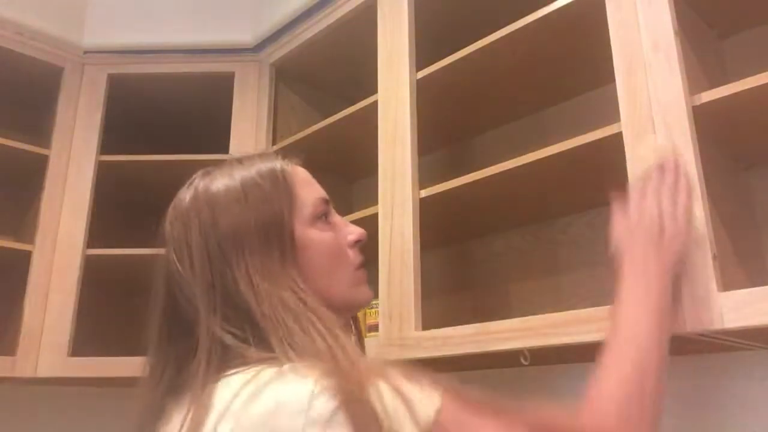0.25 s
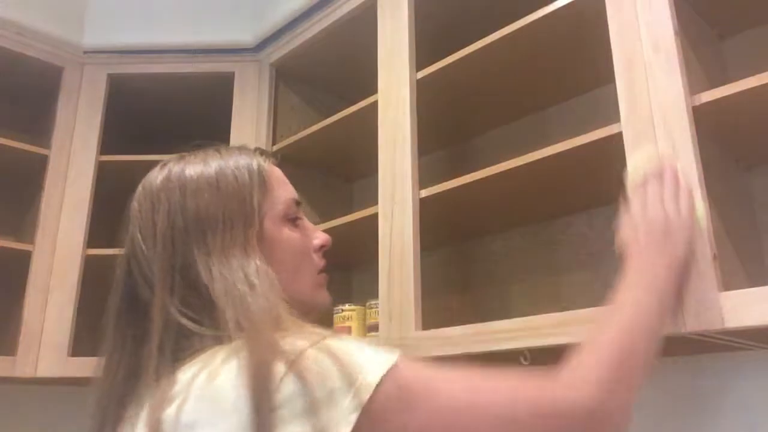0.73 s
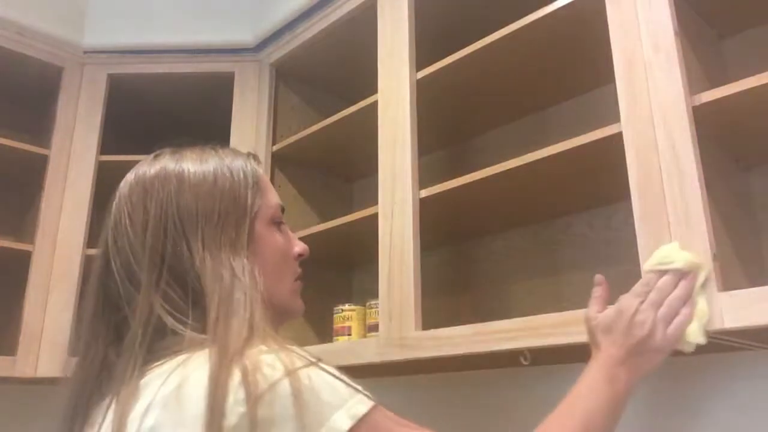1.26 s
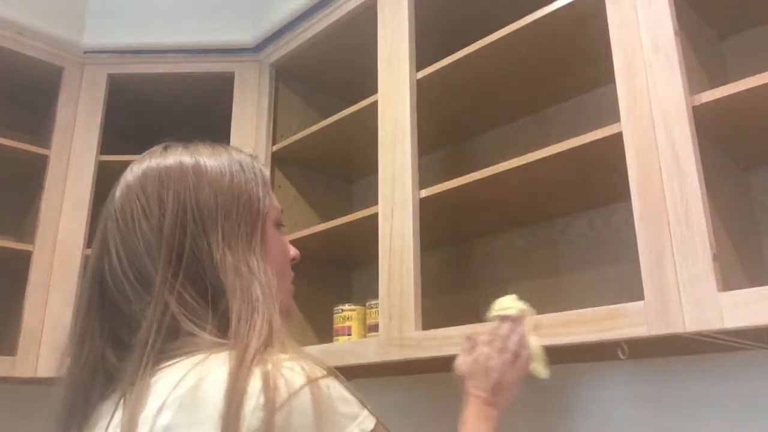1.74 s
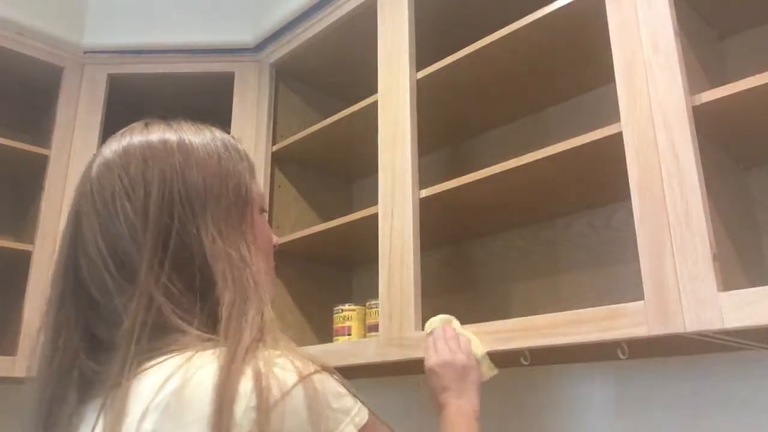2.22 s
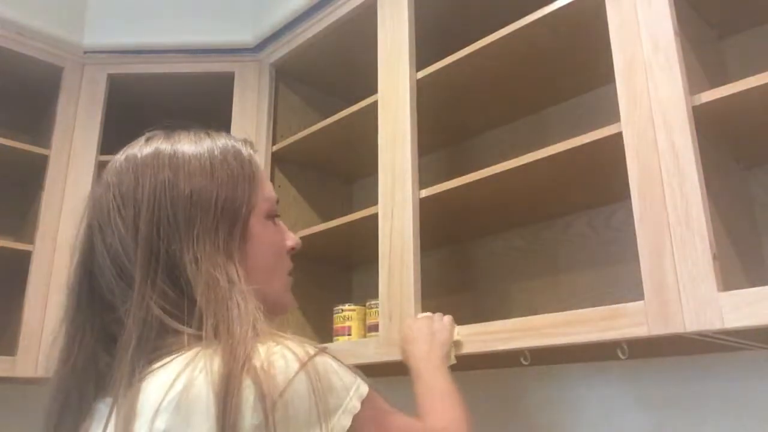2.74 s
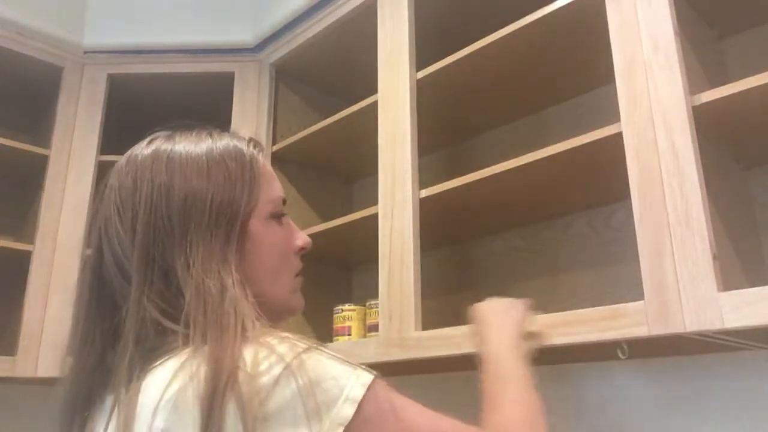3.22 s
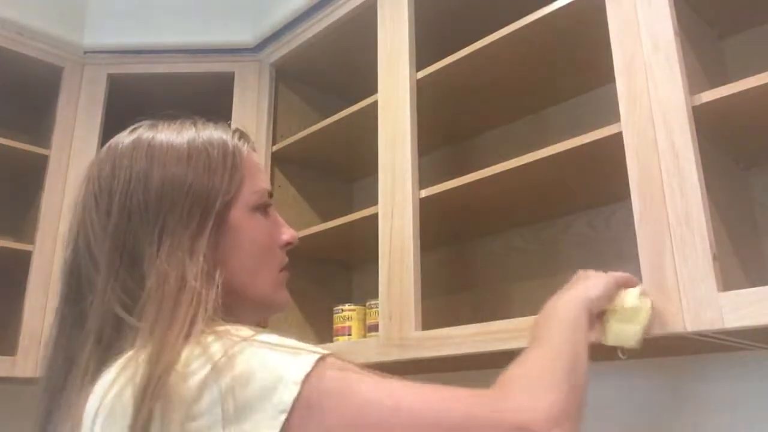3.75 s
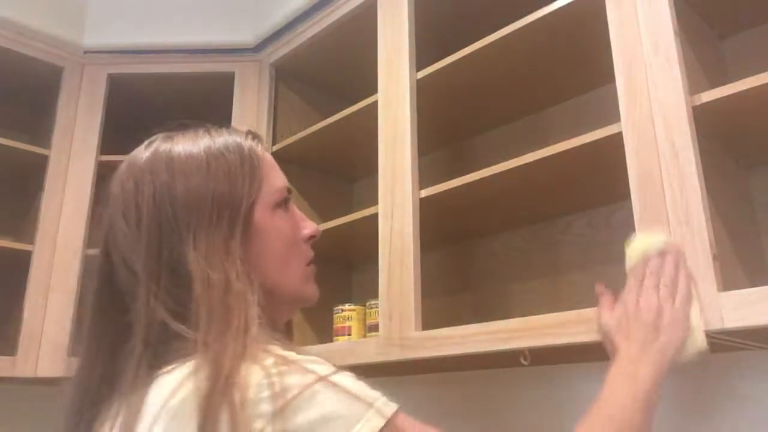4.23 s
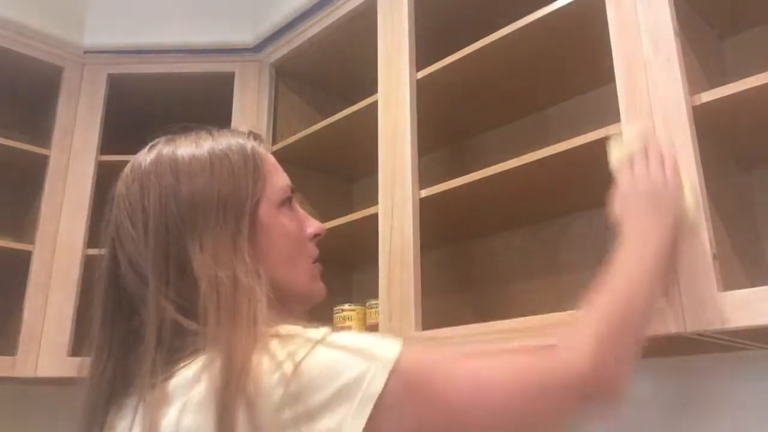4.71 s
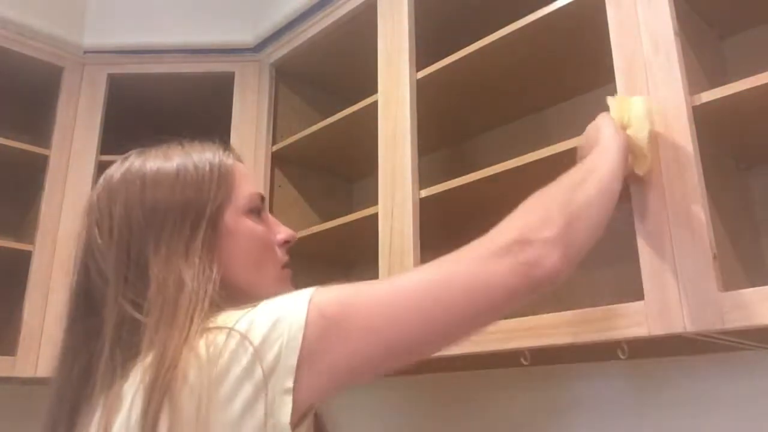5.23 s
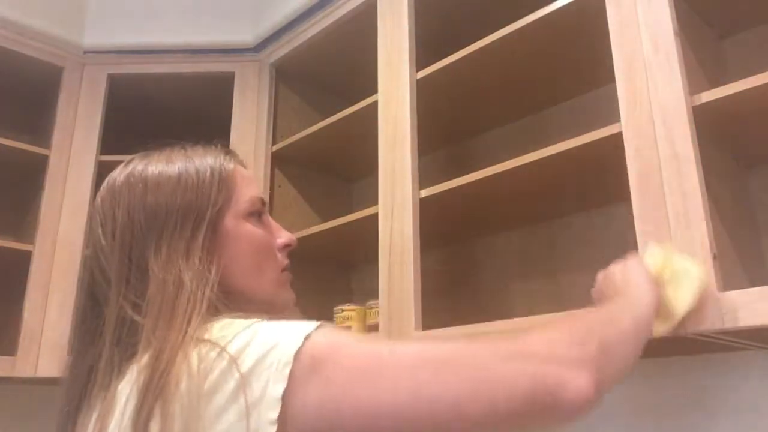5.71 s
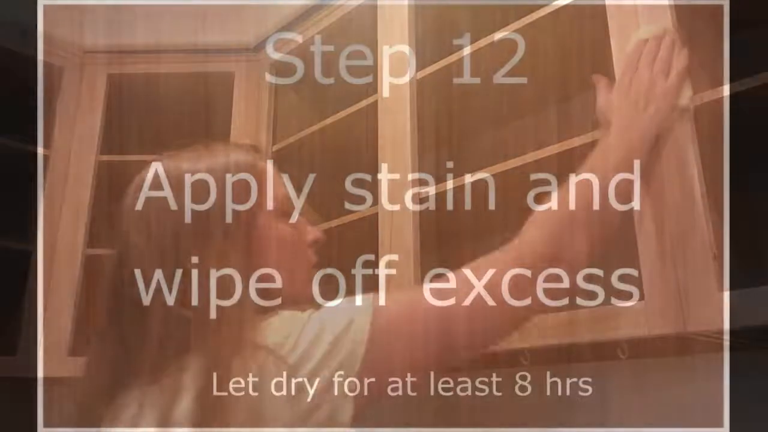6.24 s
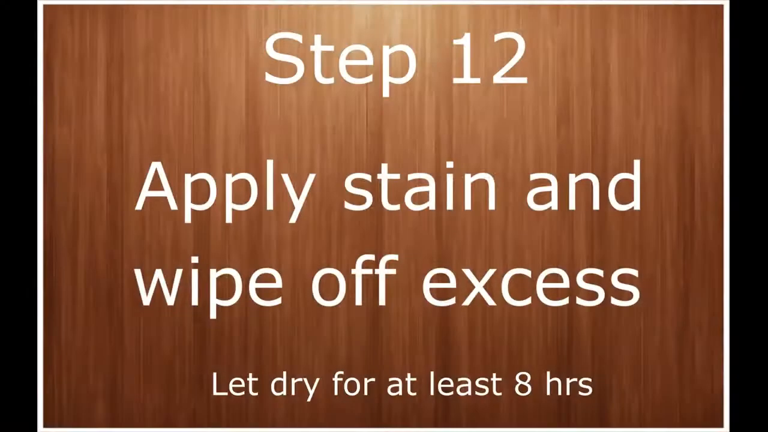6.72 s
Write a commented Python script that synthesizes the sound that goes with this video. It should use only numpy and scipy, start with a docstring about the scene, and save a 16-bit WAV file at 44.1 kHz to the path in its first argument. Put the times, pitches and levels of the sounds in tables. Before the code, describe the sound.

A cloth is wiped by hand over a wooden kitchen cabinet in a small room, quiet and in mono. An appliance motor hums and rumbles steadily throughout. From the start to about 1 second, soft hissing strokes pass, with a few small ticks and tiny creaks from the wood in the first half second. After a brief lull, scuffing strokes resume at 1.3 seconds, the hollow panels droning faintly beneath them. Between 1.9 and 2.6 seconds comes a cluster of sharper ticks, with a short creak near 2.2. The rubbing turns softer and duller until 3 seconds, then uneven hissing and scuffing strokes continue, the cloth briefly catching on the wood now and then. A few light ticks fall between 5.3 and 5.9 seconds. After one last soft stroke, everything stops abruptly at about 6.3 seconds.

```python
"""A cloth hisses and scuffs as a hand wipes the face frame of a wooden kitchen cabinet in a small room.
Sliding friction makes the sound: fast strokes hiss, pressed ones scuff, and the hollow panels drone.
Now and then the frame ticks or creaks under the hand as the wood sticks and slips.
An appliance motor hums and rumbles throughout. The sound is mono and stops abruptly."""
import sys
import numpy as np
from scipy import signal
from scipy.fft import rfft, irfft, next_fast_len
from scipy.io import wavfile
from scipy.ndimage import uniform_filter1d, map_coordinates

SR = 44100
rng = np.random.default_rng(int(sys.argv[2]) if len(sys.argv) > 2 else 0)


def unload_audio(sound):
    """Save the sound as a 16-bit wav file, at the path given as the first command line argument."""
    columns = np.transpose(np.atleast_2d(sound))
    # keep every value between -1 and 1, then stretch to whole-number steps
    steps = np.round(np.clip(columns, -1, 1) * 32767)
    wavfile.write(sys.argv[1], SR, steps.astype(np.int16))


N = 307039

# reverberation time of the room: f/Hz, T60/s
ROOM_DECAY = [(200, 0.38), (2500, 0.3), (6000, 0.3), (14000, 0.1425)]
# steady tones of the motor and the mains: f/Hz, rms level/dB
HUM_TONES = [(55.5, -61), (111.03, -55), (120.07, -53.5), (198.2, -61.5), (333.05, -62.5), (360.2, -72),
             (388.6, -64.5), (444, -73)]
# modes of the room and of the cabinet's panels: f/Hz, width/Hz, relative level/dB
ROOM_MODES = [(33.1, 10, -10.5), (55.9, 13.6, -2), (84.8, 20, -3), (132.5, 13, 2), (192, 71, -7),
              (256.4, 12, -6), (326.6, 24, -1.5), (358, 21, -3), (527.5, 24, -11)]
PANEL_MODES = [(155.7, 12, -4), (192, 27, -0.5), (216.6, 22, -3.5), (246, 18, -16)]
# modes of the frame: f/Hz, relative level/dB, T60/s
FRAME_MODES = [(1500, -29.5, .01), (1936, -13, .007), (2600, -4, 0.0089), (3450, -10, 0.0093),
               (4260, -22.5, 0.0073), (5630, -18, 0.008)]
# spectral envelopes: f/Hz, relative level/dB
AIR_SPECTRUM = [(20, -29), (50, 5), (200, 7.5), (420, 3.5), (620, 2), (800, -2), (1400, -5.5), (2200, -11),
                (3500, -18), (5000, -25), (7000, -25), (10000, -29.5), (15000, -40.5)]
CREAK_SPECTRUM = [(600, -24), (1400, -3), (2000, -10), (2500, 2.5), (3400, -10), (4300, -6.5), (5000, -10),
                  (8000, -15.5), (10500, -22.5), (15000, -33.5)]
CRACK_SPECTRUM = [(700, -22.5), (2000, 1), (4200, 3.5), (5000, 0), (6000, -0.5), (8000, -0.5), (9500, -13),
                  (15000, -27.5)]
SNAP_SPECTRUM = [(1000, -34), (3500, -19), (5000, -3), (7500, -4), (9500, -1), (13000, -4), (15500, -16)]
HISS_SPECTRUM = [(300, -6), (700, -3), (1500, -2), (3200, 4), (4200, 2.5), (4900, -2.5), (5600, 1),
                 (9700, 2.5), (10400, -1.5), (11200, 1), (13000, -0.5), (15300, -6)]
SCUFF_SPECTRUM = [(200, -7.5), (500, -7.5), (880, 4), (1300, 1.5), (1750, 2.5), (2600, -2), (3600, -3.5),
                  (4800, -10), (7000, -10.5), (10000, -26.5), (15000, -38.5)]
# runs of tiny slips in the wood: onset t/s, duration/s, level/dB
CREAK_EVENTS = [(0.049, 0.012, -43), (0.222, 0.014, -48.5), (0.327, .015, -60.5), (2.165, 0.0079, -41),
                (2.176, 0.043, -59), (5.897, 0.013, -60.5)]
# single slips of the frame: t/s, ring f/Hz, relative level/dB of ring, crack and snap
TICK_EVENTS = [(0.0461, 2760, -46, -31, -52), (0.1855, 2280, -37, -55, -63),
               (0.2287, 2100, -31.5, -43.5, -57.5), (0.3226, 2330, -37.5, -48, -62),
               (1.101, 1820, -59, -54.5, -37), (1.9411, 2600, -31.5, -36.5, -40),
               (1.997, 2320, -29, -41.5, -60), (2.086, 3400, -39.5, -46, -67),
               (2.1628, 2390, -30, -41.5, -58), (2.2335, 1500, -42.5, -48, -39),
               (2.298, 3450, -43, -41.5, -43.5), (2.5648, 3170, -33, -42.5, -57),
               (2.6182, 2880, -45, -62, -76), (3.0151, 2070, -37, -54, -69),
               (5.3184, 1970, -40, -60, -61.5), (5.3744, 2047, -40, -70, -71),
               (5.5382, 1780, -43, -58, -54.5), (5.7652, 2335, -38, -48, -64),
               (5.8953, 2756, -36.5, -64, -60.5)]
# short grips of the cloth on the wood: centre t/s, duration/s, f/Hz, level/dB
GRIP_EVENTS = [(0.018, 0.031, 3460, -56.5), (0.129, 0.028, 1850, -55.5), (1.602, .1, 3000, -61.5),
               (3.259, 0.048, 2290, -56), (3.364, .05, 3320, -60.5), (3.52, 0.058, 2500, -60),
               (3.876, 0.037, 3080, -56.5), (4.184, 0.076, 3180, -64), (5.089, 0.038, 2020, -56.5),
               (5.14, 0.018, 2430, -60.5), (5.231, 0.028, 3410, -60), (5.437, .02, 3190, -59.5)]
# strokes of the hand: onset t/s, duration/s, rise/s, fall/s, relative level/dB of hiss, scuff and drone
HAND_STROKES = [(0.0, 0.12, 0.037, 0.069, -61.5, -59.5, -51),
                (0.094, 0.53, 0.16, 0.14, -60.5, -59.5, -49.5),
                (0.595, 0.47, 0.093, .12, -60.7, -66.5, -57.5), (0.99, 0.28, .04, .13, -72.5, -79, -50),
                (1.3, .52, .12, 0.081, -61.5, -57.5, -44.5), (1.745, .285, 0.16, 0.11, -59.5, -55.5, -45.5),
                (2.098, 0.18, 0.056, .04, -71, -58.5, -49.5), (2.28, 0.11, 0.043, .07, -67.5, -56, -64),
                (2.523, 0.17, 0.084, 0.08, -86, -64, -45.5), (2.732, 0.3, 0.046, .08, -80.5, -63, -51),
                (2.953, 0.26, .15, 0.098, -66.5, -57, -59.5), (3.18, 0.31, 0.15, .12, -60.5, -55.5, -52),
                (3.416, .18, 0.075, 0.074, -63, -56.5, -51.5), (3.616, 0.21, 0.036, .08, -81.5, -69, -43.5),
                (3.818, 0.15, .05, 0.11, -65, -54.5, -50), (3.887, 0.65, .04, 0.058, -79.5, -64, -47.5),
                (4.153, 0.54, 0.37, 0.11, -62.3, -67, -48), (4.644, .385, .15, 0.083, -61, -63, -45),
                (5.02, 0.36, 0.18, .08, -78.5, -59.5, -44), (5.464, 0.42, 0.13, 0.21, -62.5, -56.5, -47),
                (5.854, 0.16, .04, 0.1, -73.5, -59.5, -61.5), (6.111, 0.18, 0.12, 0.043, -70, -67.5, -45.5)]

HISS_EXPONENT, SCUFF_EXPONENT, DRONE_EXPONENT = 0.71, .33, 0.42  # amplitude ~ speed ** exponent
HISS_REST_DB, SCUFF_REST_DB, DRONE_REST_DB = -79.5, -64, -52  # relative floors as the hand turns or creeps
END_S, TOP_HZ = 6.285, 15550


def amp(db):
    """Amplitude ratio: a factor of ten for every 20 dB."""
    return 10 ** (np.asarray(db) / 20)


def unit(x):
    """Normalisation to rms 1."""
    return x / np.sqrt(np.mean(x ** 2) + 1e-20)


def peaked(x):
    """Normalisation to peak 1."""
    return x / np.max(np.abs(x))


def along(points, hz):
    """Interpolation of (f/Hz, value) points on a logarithmic frequency axis."""
    f, v = np.transpose(points)
    return np.interp(np.log(hz + 1), np.log(f + 1), v)


def wobble(rate):
    """Random modulation: a smooth curve through `rate` knots a second."""
    knots = rng.standard_normal(int(N * rate / SR) + 4)
    return map_coordinates(knots, [np.arange(N) * rate / SR])


def filtered(x, response):
    """Linear filtering: the spectrum is multiplied by a frequency response."""
    m = next_fast_len(len(x) + 8192)
    return irfft(rfft(x, m) * response(np.fft.rfftfreq(m, 1 / SR)), m)[:len(x)]


def coloured(x, spectrum):
    """Spectral shaping by an envelope, at rms 1."""
    return unit(filtered(x, lambda hz: amp(along(spectrum, hz))))


def causal(x, spectrum):
    """Minimum-phase filtering colours a short sound and keeps its attack sharp."""
    m = len(x)
    cepstrum = irfft(np.log(amp(along(spectrum, np.fft.rfftfreq(m, 1 / SR)))), m)
    fold = 1 + np.sign(np.fft.fftfreq(m))
    return irfft(rfft(x) * np.exp(rfft(cepstrum * fold)), m)


def resonant(x, modes):
    """Resonance: steep modes, added in power, filter x; the result has rms 1."""
    power = lambda f: sum(amp(2 * db) / (1 + ((f * f - f0 * f0) / (f * width + 1e-6)) ** 2) ** 2
                          for f0, width, db in modes)
    return unit(filtered(x, lambda f: np.sqrt(power(f))))


def catches(rate, spread_db):
    """A Poisson process: catching and letting go gives random impulses of uneven size."""
    chosen = rng.random(N) < rate / SR
    return unit(chosen * rng.standard_normal(N) * amp(spread_db * rng.standard_normal(N)))


def patchy(x, depth_db):
    """Spectral modulation: the colour shifts as the contact moves over the grain."""
    z = signal.stft(x, nperseg=512)[2]
    field = uniform_filter1d(rng.standard_normal(z.shape), size=6, axis=0)  # smooth in frequency
    field = uniform_filter1d(field, size=12, axis=1)  # and in time
    return signal.istft(z * amp(depth_db * unit(field)), nperseg=512)[1][:N]


def stroking(levels_db, exponent, rest_db):
    """A power law: amplitude follows the hand's speed as each stroke speeds up, glides and slows."""
    t = np.arange(N) / SR
    energy = np.full(N, amp(rest_db) ** 2)
    for (start, length, rise, fall, *_), db in zip(HAND_STROKES, levels_db):
        on = (t > start) & (t < start + length)
        ramp = np.minimum((t[on] - start) / rise, (start + length - t[on]) / fall)
        speed = np.sin(np.pi / 2 * np.clip(ramp, 0, 1)) ** 2
        energy[on] += (amp(db) * speed ** exponent) ** 2
    return np.sqrt(energy)


def room(x, shelves_db, shelves_t60, walls_db):
    """Reverberation: reflections from the open shelves die quickly, those from the walls linger."""
    hz, t, z = signal.stft(rng.standard_normal((2, SR // 2)), SR, nperseg=256)
    walls_t60 = along(ROOM_DECAY, hz)
    t60 = np.array([shelves_t60 * walls_t60 / ROOM_DECAY[1][1], walls_t60])[:, :, None]
    tails = signal.istft(z * amp(-60 * t / t60), SR, nperseg=256)[1]
    shelves, walls = tails / np.linalg.norm(tails, axis=1, keepdims=True)
    reflections = np.pad(amp(shelves_db) * shelves + amp(walls_db) * walls, (int(.002 * SR), 0))
    return x + signal.fftconvolve(x, reflections)[:N]


def appliance():
    """Forced vibration: motor and mains tones sound over rumbling room modes and a soft rush of air."""
    t = np.arange(N) / SR
    hum = np.zeros(N)
    for hz, db in HUM_TONES:
        waver_db, phase_drift = 1.1 * wobble(3), .1 * wobble(3)
        hum += amp(db + waver_db) * unit(np.sin(2 * np.pi * (hz * t + rng.random()) + phase_drift))
    rumble = resonant(rng.standard_normal(N), ROOM_MODES) * amp(-51.5 + 1.6 * wobble(6.5))
    air = amp(-53.0) * coloured(rng.standard_normal(N), AIR_SPECTRUM)
    return hum + rumble + air


def cabinet():
    """Panel resonance: broadband rubbing drives the modes of the hollow cabinet."""
    *_, drone_db = np.transpose(HAND_STROKES)
    drone = resonant(rng.standard_normal(N), PANEL_MODES)
    return drone * stroking(drone_db, DRONE_EXPONENT, DRONE_REST_DB) * amp(-4)


def creaks():
    """Stick-slip motion: slips in the wood follow so fast that they merge into a short rasp."""
    t = np.arange(N) / SR
    envelope = sum(amp(db) * (t >= start) * np.exp(-((t - start) / length) ** 4)
                   for start, length, db in CREAK_EVENTS)
    return envelope * coloured(catches(rate=3000, spread_db=2), CREAK_SPECTRUM)


def ticks():
    """Impulse excitation: one slip gives a crack, a snap and a damped ring that depends on the spot."""
    out, t = np.zeros(N + SR), np.arange(SR // 10) / SR
    impulse = t == 0
    for start, pitch_hz, ring_db, crack_db, snap_db in TICK_EVENTS:
        hz, mode_db, t60 = np.transpose([(pitch_hz, 0, .0042)] + list(FRAME_MODES))[:, :, None]
        strength = amp(mode_db + rng.standard_normal(hz.shape))
        ring = np.sum(strength * amp(-60 * t / t60) * np.sin(2 * np.pi * hz * t), axis=0)
        splinters = .08 * rng.standard_normal(len(t)) * amp(-60 * t / .007)
        slip = impulse + splinters
        scatter = .04 * rng.standard_normal(len(t)) * amp(-60 * t / 0.055)  # spread through the joints
        tick = amp(ring_db + 2.5) * peaked(signal.fftconvolve(impulse + scatter, ring)[:len(t)])
        tick += amp(crack_db + 7.5) * peaked(causal(slip, CRACK_SPECTRUM))
        tick += amp(snap_db + 5.5) * peaked(causal(slip, SNAP_SPECTRUM))
        out[round((start + .0003) * SR):][:len(t)] += tick
    return out[:N]


def grips():
    """Frictional chatter: where the cloth grips, its noise gathers briefly around one pitch."""
    out, t = np.zeros(N + 2 * SR), np.arange(-SR // 8, SR // 8) / SR
    for centre, length, hz, db in GRIP_EVENTS:
        friction = rng.standard_normal(len(t)) * amp(3 * rng.standard_normal(len(t)))
        chatter = resonant(friction, [(hz, .5 * hz, 0)])
        envelope = amp(db) * np.exp(-2 * (t / length) ** 2)
        out[SR + round((centre + t[0]) * SR):][:len(t)] += envelope * chatter
    return out[SR:SR + N]


def cloth():
    """Sliding friction: countless fibres merge into a hiss; coarser catches under pressure scuff."""
    *_, hiss_db, scuff_db, _ = np.transpose(HAND_STROKES)
    fibres = coloured(patchy(rng.standard_normal(N), depth_db=1.3), HISS_SPECTRUM)
    catching = patchy(catches(rate=4000, spread_db=2), depth_db=1.1)
    uneven_db = .7 * wobble(35)
    grain = coloured(room(catching, shelves_db=-6.0, shelves_t60=0.064, walls_db=-9.5), SCUFF_SPECTRUM)
    hiss = fibres * stroking(hiss_db, HISS_EXPONENT, HISS_REST_DB) * amp(4.5 + 0.27 * wobble(25))
    scuff = grain * stroking(scuff_db, SCUFF_EXPONENT, SCUFF_REST_DB) * amp(uneven_db)
    return hiss + scuff


def scene():
    """Superposition: the pressures of all sources add at one point, the same in both channels."""
    frame = room(ticks() + creaks(), shelves_db=-8, shelves_t60=0.034, walls_db=-5.5)
    mono = cloth() + grips() + cabinet() + frame + appliance()
    return np.array([mono, mono])


def record(dry):
    """Gating and band limiting: the sound stops at END_S and holds nothing above TOP_HZ."""
    gate = np.clip((END_S - np.arange(N) / SR) / .008 + .5, 0, 1)
    return np.array([filtered(x * gate, lambda hz: hz < TOP_HZ) for x in dry])


dry = scene()
out = record(dry)
unload_audio(out)
```